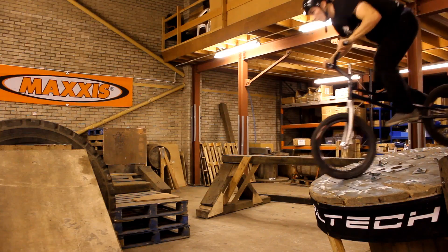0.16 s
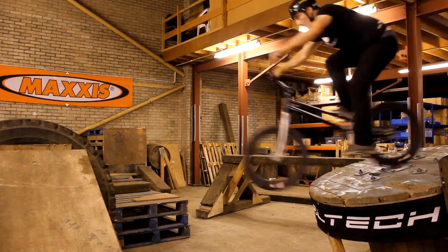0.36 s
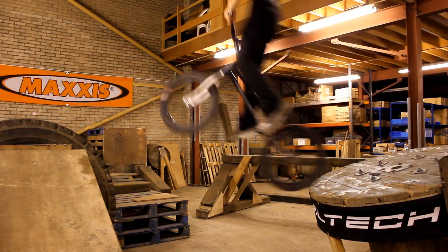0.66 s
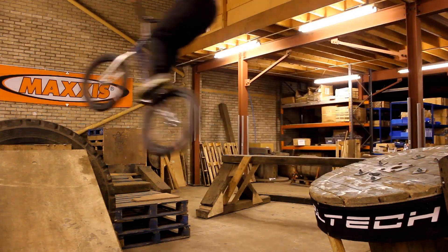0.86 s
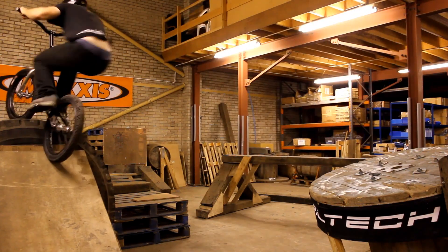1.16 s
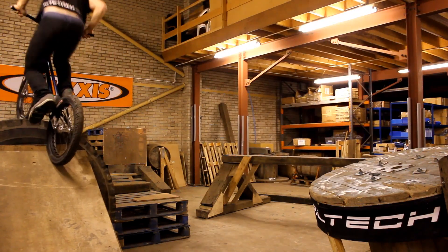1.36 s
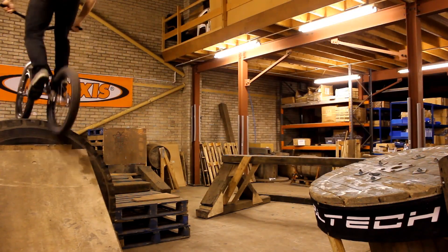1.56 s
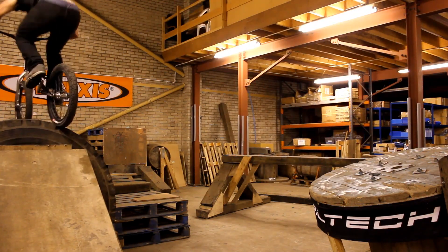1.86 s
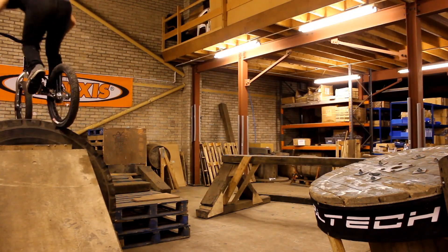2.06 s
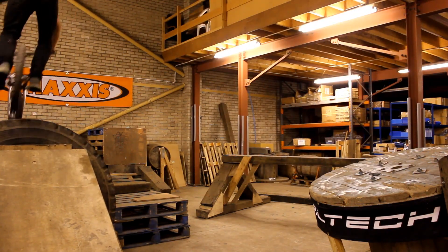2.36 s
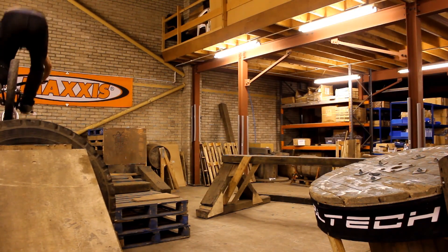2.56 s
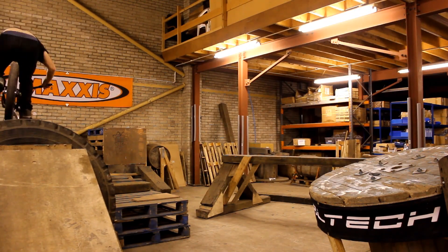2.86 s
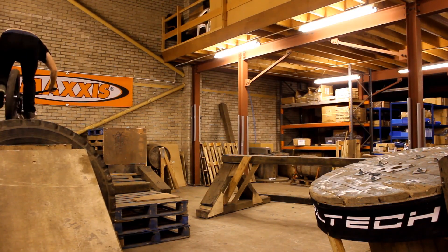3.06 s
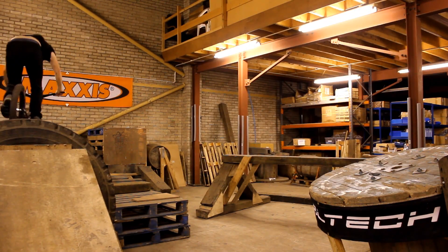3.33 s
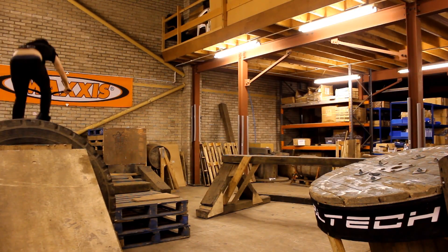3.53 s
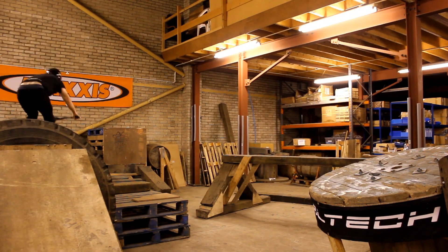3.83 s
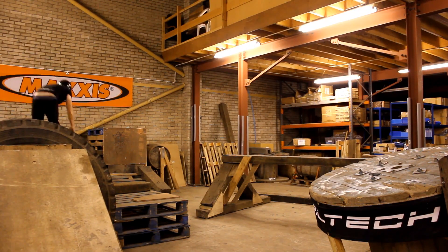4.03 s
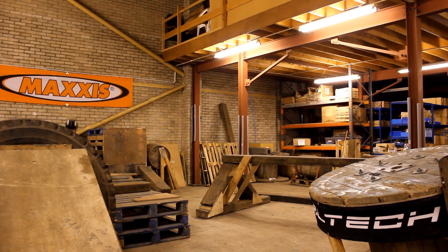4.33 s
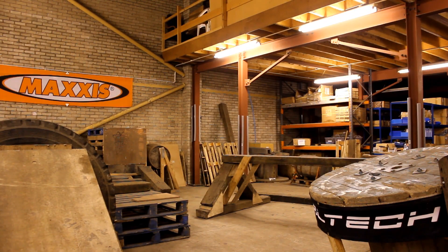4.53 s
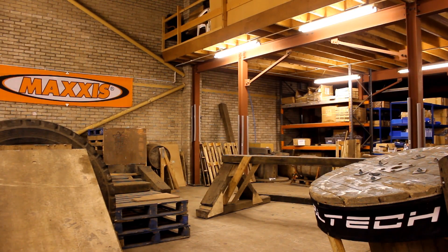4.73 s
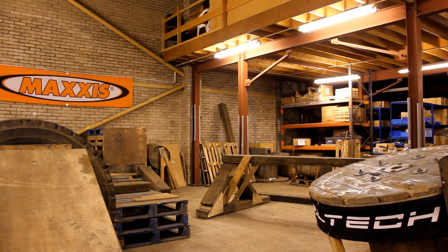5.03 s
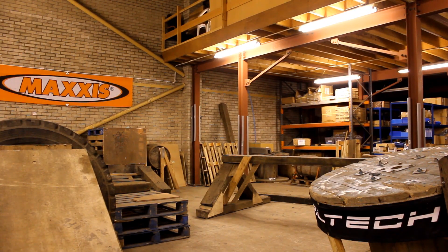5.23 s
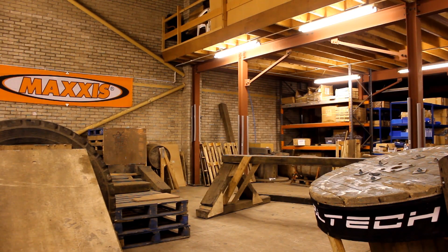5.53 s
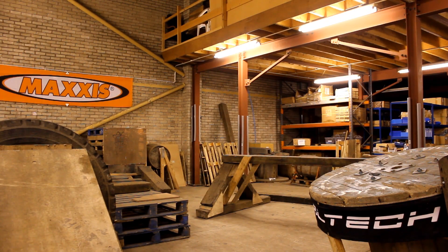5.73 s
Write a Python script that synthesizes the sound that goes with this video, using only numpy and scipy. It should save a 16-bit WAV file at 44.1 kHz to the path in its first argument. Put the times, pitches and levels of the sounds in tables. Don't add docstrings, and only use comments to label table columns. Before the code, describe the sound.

Soft tyre scuffs and knocks, then a bicycle's freewheel buzz leads to a heavy, boomy landing on hollow boards. Smaller bumps, clacks of frame and chain, and slow even ticking follow in the calmer middle. A very hard floor drop cracks through the hall, followed by short, rough, low-pitched brake shudders with sharp snaps. Everything is washed in about a second of dense hall echo over faint room air.

```python
import sys
import numpy as np
from scipy import signal
from scipy.fft import rfft, irfft
from scipy.io import wavfile
from scipy.ndimage import uniform_filter1d

SR = 44100
rng = np.random.default_rng(int(sys.argv[2]) if len(sys.argv) > 2 else 0)


def transcribe(signal):
    frames = np.atleast_2d(signal).T
    limited = np.clip(frames, -1, 1)
    pcm = np.round(limited * 32767).astype(np.int16)
    wavfile.write(sys.argv[1], SR, pcm)


def elevation(decibels):
    levels = np.asarray(decibels, float)
    return 10 ** (levels / 20)


N = 259660


def rms_one(x):
    return x / np.sqrt(np.mean(x ** 2) + 1e-20)


def at_hz(points, hz):
    points_hz, values = np.array(points)[:, 0], np.array(points)[:, 1]
    return np.interp(np.log(hz), np.log(points_hz), values)


def band(x, low_hz, high_hz):
    sos = signal.butter(2, [low_hz, min(high_hz, .45 * SR)], "band", fs=SR, output="sos")
    return signal.sosfilt(sos, x + 1e-18)


def colour(x, spectrum):
    hz = np.maximum(np.arange(len(x) // 2 + 1) * SR / len(x), 1)
    return rms_one(irfft(rfft(x) * elevation(at_hz(spectrum, hz)), len(x)))


def ring(x, hz, t60):
    radius, turn = elevation(-60 / (t60 * SR)), 2 * np.pi * hz / SR
    feed = [(1 - radius ** 2) / 2, 0, (radius ** 2 - 1) / 2]
    return signal.lfilter(feed, [1, -2 * radius * np.cos(turn), radius ** 2], x + 1e-18)


def spells(rows):
    t, gain = np.arange(N) / SR, np.zeros(N)
    for s, length, start_db, end_db in rows:
        sounding = (t >= s) * (t < s + length)
        gain += elevation(np.interp(t, [s, s + length], [start_db, end_db])) * sounding
    return uniform_filter1d(gain, size=400)


def blows():
    # start_s, knock_db, thump_db (rel), crack_db (rel)
    open_blows = [(.238, -48, -23, -7), (.244, -30.5, -22, -10), (.309, -22, -46, -7.5),
                  (.524, -28, -30, -1), (.573, -25, -10, -9), (1.149, -18, -29, 3.5), (1.426, -14, -6, -28),
                  (1.442, -15, -10.5, -7), (1.828, -31, 1, -19), (3.582, -24, 2, -21),
                  (4.201, -6.5, -18.5, -17), (4.222, 2, -30, -21), (4.284, -15, -35, -2.5),
                  (5.206, -19, -9, -30), (5.219, -19, -41, 4.5), (5.539, -17, -21, -44),
                  (5.69, -13.5, -14, 2)]
    # start_s, knock_db, thump_db (rel), crack_db (rel)
    held_blows = [
        (.33, -21.5, -35, -13),
        (1.053, -1.5, -3.5, -13.5),
        (1.689, -39, -15, 8),
        (2.462, -30, 0, -20),
        (2.508, -28.5, 0.5, -1),
        (2.544, -22, -41, -1),
        (4.475, -17, -5, -7.5),
        (5.487, -15.5, -18, -16),
        (5.589, -17, -23, -19),
    ]
    # start_s, knock_db, thump_db (rel), crack_db (rel), contact_s
    open_shoves = [(.101, -41, -6, -13, .028), (.181, -39, -1, -29, 0.024), (.309, -29, -5, -28, 0.048),
                   (.679, -35.5, -1, -3, 0.019), (2.198, -50, 1, 1, .014), (2.579, -29, -3.5, -18, .044),
                   (3.188, -55.5, 10.5, 3, 0.041), (3.342, -36.5, -6, -13, 0.016),
                   (3.67, -28.5, -7, -6.5, 0.081), (3.82, -38.5, -2, -20, .02), (4.186, -30, 6, -46, 0.019),
                   (4.741, -16.5, -8, -44, 0.026), (4.81, -10, -24.5, -31, 0.037)]
    # start_s, knock_db, thump_db (rel), crack_db (rel), contact_s
    held_shoves = [(.485, -24.5, -14, -19, 0.032), (1.769, -32.5, -1, -14, 0.016),
                   (2.43, -38, 4, -17, 0.023), (2.51, -29.5, 8, -8, 0.034), (3.585, -25, -3.5, -2.5, 0.044),
                   (3.62, -23, -2, -7, 0.041), (4.205, -8.5, -50, -16, 0.028),
                   (4.235, -3.5, -22, -18, 0.035), (4.289, -8.5, -19, -18, 0.083),
                   (4.409, -15.5, -3.5, -20, 0.018), (5.301, -24.5, -40, 1, 0.02),
                   (5.7, -16, -17.5, -12, 0.031)]
    blow_s = .0072
    loose_db, held_db = -47, 4.5

    sharp = [(*row, blow_s, loose_db) for row in open_blows] + [(*row, blow_s, held_db) for row in held_blows]
    drawn = [(*row, loose_db) for row in open_shoves] + [(*row, held_db) for row in held_shoves]
    contacts = sharp + drawn
    direct, spread = np.zeros((4, N)), np.zeros((2, 4, N))
    t = np.arange(6000) / SR
    shape = (len(contacts), 6000)
    grit = rng.standard_normal(shape) * elevation(1.57 * rng.standard_normal(shape))
    for k, (s, knock_db, thump_db, crack_db, contact, rim_db) in enumerate(contacts):
        i, contact = round(s * SR), max(contact, .002)
        forces = elevation(knock_db + np.array([thump_db, 0, crack_db, crack_db + rim_db]))
        envelope = np.minimum(t / (20.0 * contact ** 2), 1) * np.exp(-(t / contact) ** 2)
        burst = forces[:, None] * grit[k] * envelope
        direct[:, i:i + 6000] += elevation(2.5) * burst
        if k < len(sharp):
            spread[k % 2, :, i + round(contact * SR)] += forces * np.sqrt(contact * SR / 2)
        else:
            spread[k % 2, :, i:i + 6000] += burst
    echoes = sum(hall(struck(*path), wet_db=3.5, build_s=0.00043) for path in spread)
    return struck(*direct) + echoes


def struck(thump, knock, crack, hiss):
    # mode_hz, level_db, t60_s
    ramp_modes = [(151, -9, 0.22), (223.4, -1, 0.064), (268, -6.5, 0.086), (372.4, -9.5, .1),
                  (424, -0.5, 0.1), (526, -14, 0.019), (737, -24.5, 0.17)]
    ramp = sum(elevation(db) * ring(thump, hz, t60) * (-1) ** k for k, (hz, db, t60) in enumerate(ramp_modes))
    tyre = band(band(thump, 114.5, 342), 65, 890)
    boards = band(band(knock, 244, 2220), 310, 5700)
    wood = elevation(22.5) * ramp + elevation(14.5) * tyre + elevation(3.5) * boards

    rim_edge = signal.ellip(6, 1, 40, 10250, "high", fs=SR, output="sos")
    rim = band(signal.sosfilt(rim_edge, hiss), 10150, 12700)
    frame = -elevation(-1.0) * band(crack, 3040, 6410) + elevation(-9.0) * band(crack, 7700, 13800)
    return wood + frame + elevation(-0.5) * rim


def thuds():
    # mode_hz, level_db, t60_s
    landing_panels = [(49.4, -21, .27), (96, -23, 0.6), (161, -15.5, 0.49), (216, -12.5, 0.64),
                      (354, -5, 0.095)]
    # start_s, peak_db, panel_hz
    pressed = [
        (1.438, -30, 147),
        (1.787, -17, 137),
        (1.812, -19, 209),
        (2.21, -22, 143),
        (2.216, -29, 208),
        (3.591, -33, 135),
    ]
    # start_s, peak_db, panel_hz
    free = [(.69, -31, 124), (.762, -38, 112), (1.79, -27.5, 66.5), (2.45, -28, 54), (2.52, -26, 50),
            (3.6, -27, 90), (3.622, -21, 254.5), (4.4, -24, 65), (4.419, -21, 123), (4.502, -27.5, 156),
            (4.6, -33, 49.5), (5.2, -41, 109), (5.702, -42, 99.6)]
    # start_s, peak_db, panel_hz
    loose = [
        (.33, -33.5, 126.3),
        (4.302, -25.5, 165),
    ]
    landing_s = 1.056

    pushes = [(landing_s, db, hz, t60) for hz, db, t60 in landing_panels]
    for rows, t60 in [(pressed, 0.09), (free, 0.24), (loose, 1)]:
        pushes += [(*row, t60) for row in rows]
    out, t = np.zeros(N + SR), np.arange(SR) / SR
    for s, db, hz, t60 in pushes:
        swell = 1 - np.exp(-t * hz)
        out[round(s * SR):][:SR] += elevation(db - 60 * t / t60) * swell * np.sin(2 * np.pi * hz * t)
    beating = rms_one(band(rng.standard_normal(N), 19, 46))
    return out[:N] * elevation(4.1 * beating - 4.0)


def brakes():
    # start_s, length_s, rub_start_db, rub_end_db
    pulls = [
        (4.6, 0.141, -22.5, -24.5),
        (4.739, .13, -22, -18.5),
        (4.869, 0.28, -29, -27.5),
        (5.184, 0.029, -21, -11.5),
        (5.207, 0.045, -13.5, -26),
        (5.27, .13, -32, -39),
        (5.468, .18, -21, -25.5),
        (5.654, 0.026, -17, -11),
        (5.686, 0.048, -15, -24),
        (5.731, 0.22, -37, -23),
    ]
    # rim_hz, level_db (per Hz)
    rim = [(120, -35), (200, -15), (424, 1), (763, -7), (1350, -2), (1620, 3.5), (2020, 2.5), (2380, -1),
           (2610, -5), (2910, -4.5), (4120, -11), (6400, -18), (11100, -21), (14100, -24.5), (16000, -31)]
    # start_s, slips_per_s
    grips = [
        (4.58, 450),
        (4.74, 565),
        (5.18, 672),
        (5.46, 525),
        (5.65, 665),
        (5.715, 440),
    ]

    starts, rates = np.transpose(grips)
    rate = uniform_filter1d(rates[np.searchsorted(starts[1:], np.arange(N) / SR)], size=900)
    faster = rate - 560
    tone_db, boom_db = 2 + .04 * faster, 2 - .075 * faster

    wander = rms_one(band(rng.standard_normal(N), 17, 90))
    pulses = np.diff(np.floor(np.cumsum(rate * (1 + .03 * wander)) / SR), prepend=0)
    grind = rng.standard_normal(N) * elevation(3.2 * wander)
    uneven_grip = elevation(5.0 * rms_one(band(rng.standard_normal(N), 26, 300)))
    slips = elevation(tone_db) * rms_one((pulses - pulses.mean()) * uneven_grip)
    singing_pads = band(band(slips, 940, 3300), 850, 3300)
    rub = colour(slips + grind, rim) + elevation(-17.0) * singing_pads
    boom = (elevation(boom_db) - 1) * band(rub, 207, 940)
    return elevation(-8.5) * spells(pulls) * (rub + boom)


def freewheel():
    # start_s, length_s, whirr_start_db, whirr_end_db
    spins = [(0, 0.12, -45, -62), (.45, .07, -50, -58), (.55, 0.18, -41, -66), (.67, 0.099, -46, -32.5),
             (.77, .27, -35, -32), (1.52, 0.15, -41.5, -43.5), (1.685, 0.076, -41, -46),
             (1.78, 0.066, -49, -39.5), (2.153, 0.335, -48, -41.5), (2.82, 0.11, -60, -55),
             (2.94, 0.35, -46, -49.5), (3.32, .26, -47, -39.5), (3.92, 0.26, -49, -55.5)]
    # pawl_hz, level_db (per Hz)
    pawls = [(880, -33), (1500, -15), (2880, -8), (3280, -2.5), (5170, -6), (8320, -4), (14300, -7),
             (16000, -11.5)]
    # s (first tick), gap (s), db (peak), count (ticks)
    tick_runs = [
        dict(s=2.155, gap=.0249, db=-33, count=11),
        dict(s=2.8375, gap=.02405, db=-35, count=18),
    ]

    strikes = rng.standard_normal(N) * (rng.random(N) < 4000 / SR)
    flutter = elevation(1.36 * rms_one(band(rng.standard_normal(N), 3.1, 40)))
    whirr = elevation(-3.5) * spells(spins) * flutter * colour(strikes, pawls)

    clicks = np.zeros(N)
    for run in tick_runs:
        late, size = rng.uniform(-1.5, 1.5, (run["count"], 2)).T
        s = run["s"] + run["gap"] * np.arange(run["count"]) + .002 * late
        clicks[(s * SR).astype(int)] = elevation(run["db"] + 3.0 * size + 1.5)
    click_tail = 0.55 * rng.standard_normal(150) * np.exp(-np.arange(150) / 85.0)
    return whirr + band(signal.lfilter(click_tail, 1, clicks), 3500, 10400)


def snaps():
    # start_s, peak_db
    slaps = [
        (.124, -36),
        (.186, -33),
        (2.748, -38),
        (5.491, -8),
        (5.497, -13),
        (5.54, -13),
        (5.59, -17),
    ]
    clicks = np.zeros(N)
    for s, db in slaps:
        clicks[round(s * SR)] = elevation(db + 17)
    return band(band(clicks, 2400, 4000), 1800, 4500)


def squeaks():
    # start_s, level_db, pitch_hz, length_s
    chirps = [(0.0, -51, 806, .17), (0.5, -37, 3300, .04), (0.497, -34, 2000, .015), (0.53, -42, 4050, .04),
              (0.93, -40, 3320, .08), (0.307, -30, 4300, .01), (0.307, -32, 6000, .01),
              (0.33, -44, 6050, .05), (5.192, -21, 2660, .045), (5.2, -25, 1400, .025),
              (5.27, -29, 2700, .05), (5.665, -24, 2000, .06)]
    out = np.zeros(N)
    for s, db, hz, length in chirps:
        t, i = np.arange(round(length * SR)) / SR, round(max(s, 0) * SR)
        envelope = np.sin(np.pi * (t / length) ** .5)
        out[i:i + len(t)] += elevation(db) * np.sin(2 * np.pi * hz * t) * envelope
    return out


def rolling():
    # start_s, length_s, rumble_start_db, rumble_end_db
    rolls = [
        (.09, 0.27, -36, -40),
        (.305, 0.33, -25, -47),
        (.69, 0.35, -46, -73),
        (2.1, 0.094, -57, -39),
        (2.23, .09, -49, -72),
        (2.8, .3, -50, -72),
        (3.2, .12, -58, -70),
        (3.34, 0.12, -44.5, -46),
    ]
    knobs = rng.standard_normal(N) * (rng.random(N) < 400 / SR)
    return elevation(-11) * spells(rolls) * rms_one(band(knobs, 260, 590))


def hall(x, wet_db, build_s):
    # band_hz, t60_s
    decay = [(40, 0.94), (150, 0.88), (500, 1.052), (1500, 0.95), (4000, 0.78), (8000, 0.52), (16000, 0.48)]
    edges = 30 * 2 ** np.arange(0, 9.6, .5)
    t = np.arange(2 * SR) / SR
    white = rng.standard_normal((2, len(t)))
    echoes = np.zeros(len(t))
    for k, (low, high) in enumerate(zip(edges, edges[1:])):
        t60 = at_hz(decay, np.sqrt(low * high))
        echoes += band(white[k % 2], low, high) * elevation(-60 * t / t60)
    echoes = echoes * (1 - np.exp(-t / build_s))
    return elevation(wet_db) * signal.fftconvolve(x, echoes / np.sqrt(np.sum(echoes ** 2)))[:N]


def room_air():
    # air_hz, level_db (per Hz)
    air = [(18, -54), (30, -12), (149, -7.5), (189, -13), (252, -4), (526, -13.5), (569, -12), (740, -13),
           (2230, -19), (16000, -40.5)]
    return elevation(-63 + 10.5) * colour(rng.standard_normal(N), air)


def scene():
    far = rolling() + brakes()
    hub = freewheel()
    close = squeaks() + thuds() + snaps()
    echoes = hall(far + elevation(-7.5) * hub + elevation(-8) * close, wet_db=2.0, build_s=0.0026)
    return (blows() + far + hub + close + echoes + room_air())[None]


def thinned(x, mask_db, spread_db):
    hz, _, z = signal.stft(x, SR, nperseg=1024)
    power = np.abs(z[:512]) ** 2
    groups = power.reshape(64, 8, -1).sum(axis=1)
    centre_hz = hz[4:512:8, None]
    threshold_db = mask_db + (centre_hz - 12000) / 4000 + spread_db * rng.standard_normal(groups.shape)
    lowest = power.sum(axis=0) * elevation(2 * threshold_db)
    z[:512] *= np.repeat((groups > lowest) | (centre_hz < 6000), 8, axis=0)
    return signal.istft(z, SR, nperseg=1024)[1][:N]


def band_limit(x):
    return signal.sosfilt(signal.butter(12, 16290, fs=SR, output="sos"), x)


def record(dry):
    loud = np.clip(dry[0], -.98, .98)
    top_cut = signal.ellip(10, .5, 70, 16150, fs=SR, output="sos")
    sparse = thinned(signal.sosfilt(top_cut, loud), mask_db=-44, spread_db=6)
    return band_limit(sparse[None])


dry = scene()
out = record(dry)
transcribe(out)
```